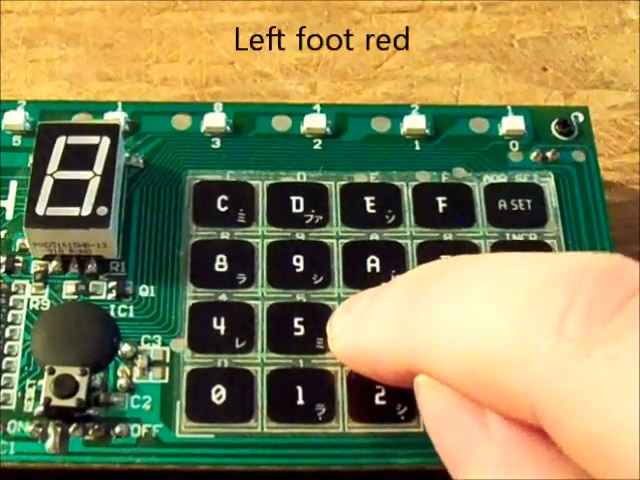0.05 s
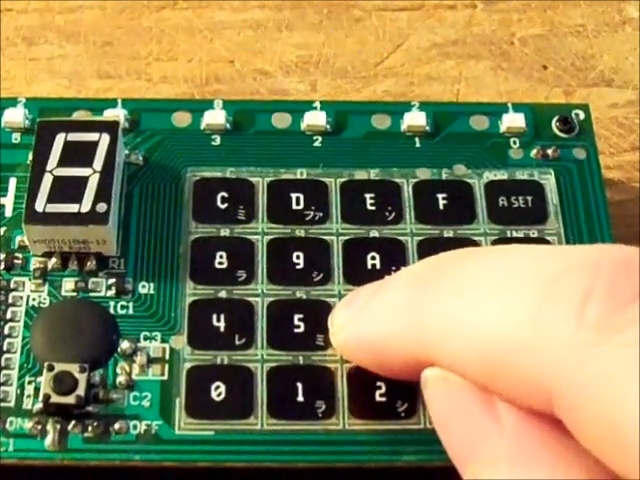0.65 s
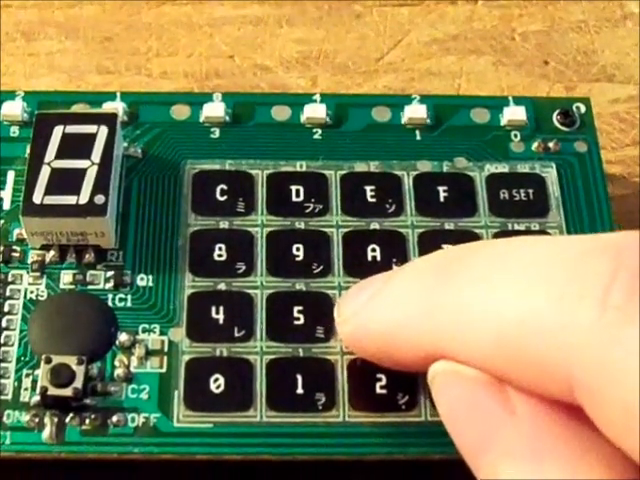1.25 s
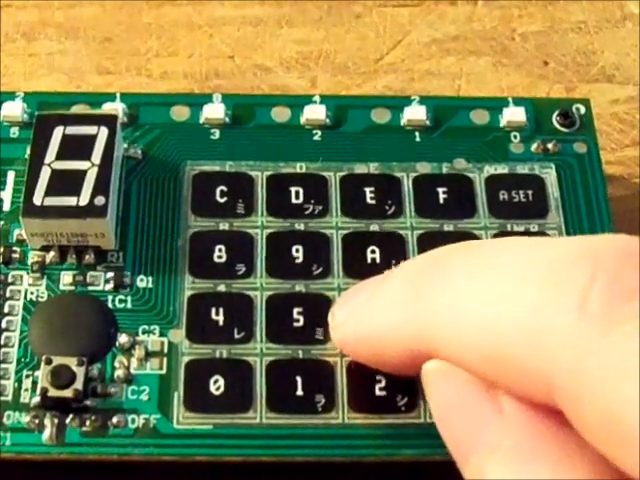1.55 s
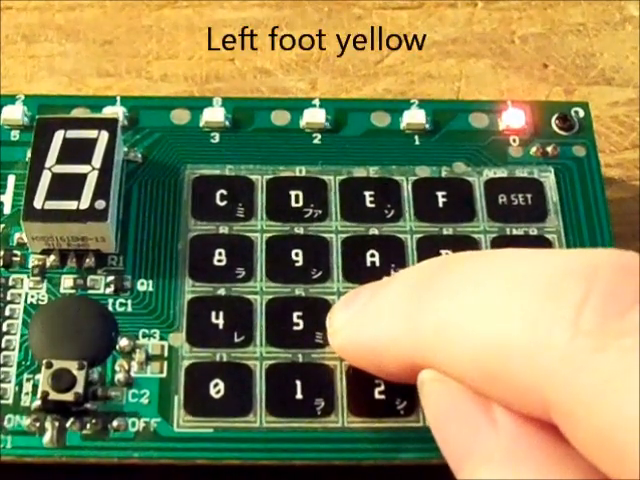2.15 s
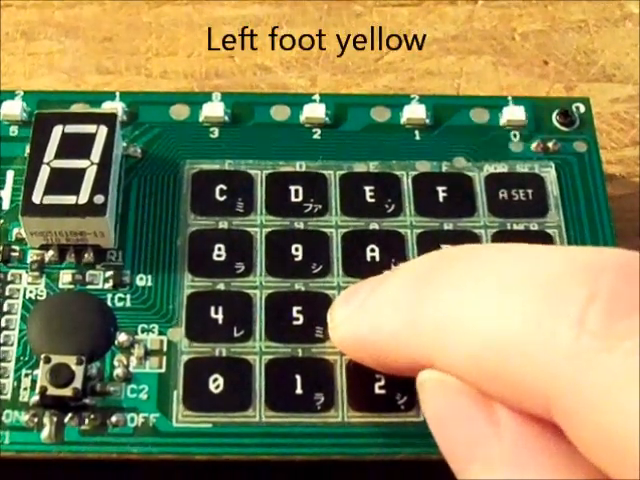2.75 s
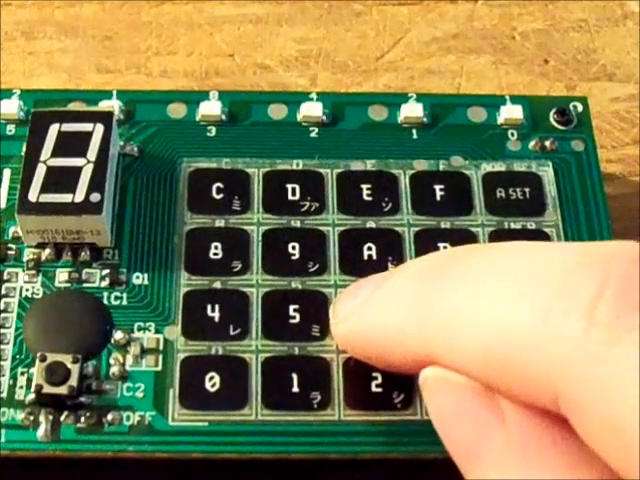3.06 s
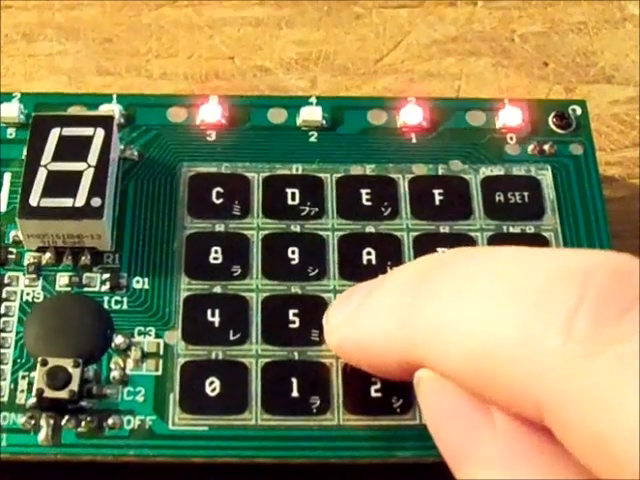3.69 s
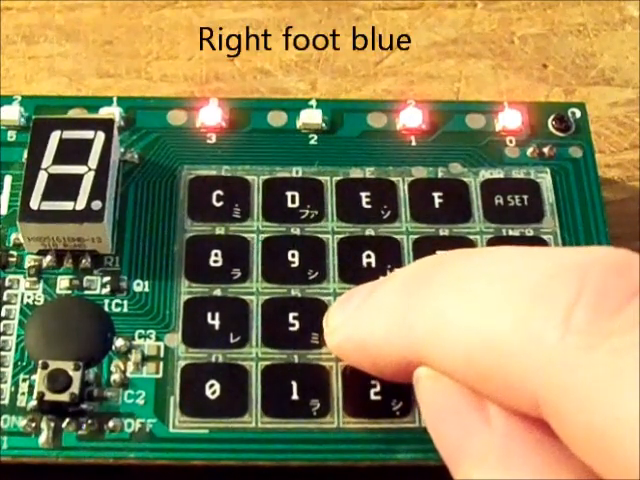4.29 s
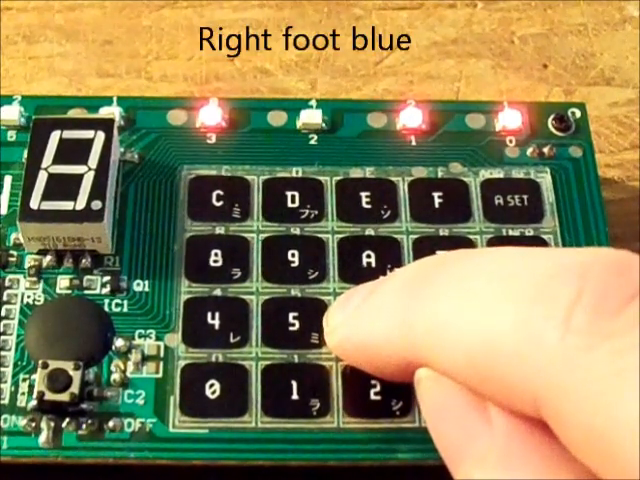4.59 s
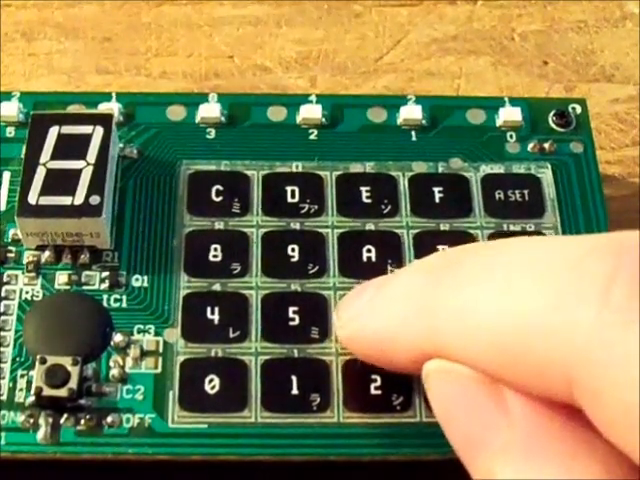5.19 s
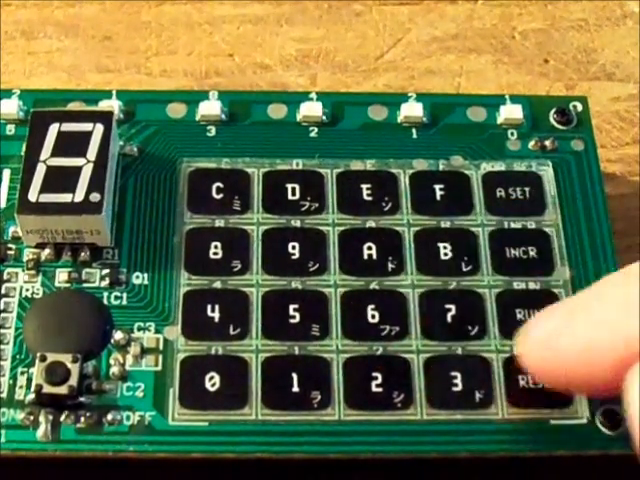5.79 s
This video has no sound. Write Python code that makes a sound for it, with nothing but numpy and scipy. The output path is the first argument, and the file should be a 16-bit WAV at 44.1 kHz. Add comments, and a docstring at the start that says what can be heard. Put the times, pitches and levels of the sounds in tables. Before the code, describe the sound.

A finger presses small plastic keys on a bare circuit board lying on a wooden table. A few faint ticks lead to one sharp double click, then lighter clicks follow a second or so apart, each ringing very briefly. Near the end the finger slides off with faint scrapes and a tiny tick. The microphone is close, in a small room with steady soft hiss and low rumble.

```python
"""Short plastic ticks come from the small keys of a keypad, pressed by a finger.
Each key snaps and shakes the bare circuit board under it, which lies on a wooden table
and rings briefly in a small room. At the end the finger slides off with faint scrapes.
A low room rumble and a soft hiss go on throughout. The recorder turns the level down
at the loudest snap and lets it creep back."""
import sys
import numpy as np
from scipy import signal
from scipy.fft import rfft, irfft
from scipy.io import wavfile
from scipy.ndimage import uniform_filter1d

SR = 44100
rng = np.random.default_rng(int(sys.argv[2]) if len(sys.argv) > 2 else 0)


def put_to_file(sound):
    """Save the sound as 16-bit audio at rate SR, in the file named by the first command-line argument."""
    columns = np.atleast_2d(sound).T  # one column per channel
    safe = np.clip(columns, -1, 1)
    whole_steps = np.round(safe * 32767)
    wavfile.write(sys.argv[1], SR, whole_steps.astype(np.int16))


N = 257544
T = np.arange(int(.25 * SR)) / SR  # seconds within one short sound
NOISE_TOP_HZ = 13950  # upper limit of the scrapes and the hiss


def keys(chatter_db=-6, chatter_s=0.00069, crack_db=-10, crack_s=0.0029):
    """Each contact is a tap plus a brief chatter of loose plastic, which rings the key and the board."""
    # Tones of a key cap and its spring: pitch_hz, level_db, ring_s
    key_tones = [(2000, -10.5, 0.016), (2960, -1, 0.013), (3355, -1.5, 0.016), (3950, 0, 0.011),
                 (5360, 0.5, 0.0042), (7700, -4.5, 0.012), (8540, -0.5, 0.0051), (9200, -27, 0.0022),
                 (9650, -11, 0.0036), (11500, -7, 0.0043), (13700, -4, .005)]
    # Tones of the board on the table: pitch_hz, level_db, ring_s
    board_tones = [(783, 3.5, 0.054), (1277, 0.5, 0.049), (1370, 1, 0.013), (1570, -8, .03),
                   (1630, -9, 0.027), (1780, -15, 0.024), (1940, -1, 0.033), (2094, -2, 0.015),
                   (2306, -9, 0.048), (2860, -8, 0.02), (3300, -23, .05)]
    out = np.zeros(N)
    for start_s, level_db, favoured_hz, pitch_factor, board_db, brightness in contacts():
        chatter, crack = rng.standard_normal((2, len(T)))
        push = undb(chatter_db) * unit(chatter * T * np.exp(-T / chatter_s))
        push[0] += 1  # the tap itself
        # countless fast-dying tones fill the gaps between the clear ones
        crack = unit(cut(crack * np.exp(-T / crack_s), 1500, "high"))
        body = ring(key_tones, pitch_factor) + undb(board_db) * ring(board_tones)
        body += undb(crack_db) * crack
        click = signal.fftconvolve(push, body)[:len(T)]
        click = favour(click, favoured_hz, boost_db=7)  # the struck spot stresses one pitch
        click = favour(click, hz=5500, boost_db=5)  # so does the metal dome under the key
        # harder blows are brighter: the treble reaches an octave higher for every 10 dB
        top_hz = brightness * 1.55 * favoured_hz * 2 ** ((level_db + 32) / 10)
        click = cut(click, top_hz, "low")
        # a small cap moving alone gives little bass; pressing on the board gives more
        lowest_hz = np.interp(board_db, [-14.5, -6.5], [3700, 520])
        add(out, start_s, cut(click, lowest_hz, "high"), level_db)
    return board_travel(out)


def contacts(snap_hz=8300, snap_board_db=-11.5, landing_lag_s=.0015, landing_brightness=0.7):
    """A rocking key makes one contact; a full press makes a bright snap, then a cushioned landing."""
    # Keys rocking under the finger (board_db is how strongly the board joins in):
    # start_s, level_db, favoured_hz, pitch_factor, board_db
    taps = [ (0.3441, -35, 2130, 1.06, -1), (0.8048, -32.5, 8000, 1.23, -11),
            (0.8211, -32, 3380, 0.88, -14), (0.8764, -17.5, 3200, 0.89, -1.5),
            (0.9625, -36.5, 2800, 0.85, -8), (1.5914, -31.5, 3980, 0.85, 4), (2.8502, -25, 2960, 0.93, -3),
            (2.8663, -32, 1880, 0.92, -5), (2.941, -32.5, 1860, 0.92, -9), (3.7106, -32, 1450, 0.74, -2), ]
    # Full presses (favoured_hz and board_db belong to the landing):
    # start_s, snap_db, landing_db, favoured_hz, pitch_factor, board_db
    presses = [ (0.8847, -24, -19, 1720, 1.04, 2), (2.8952, -28, -26, 4130, 1.03, 2.5),
               (5.0526, -32.5, -26, 4060, 1.01, 3.5), ]
    for start_s, level_db, favoured_hz, pitch_factor, board_db in taps:
        yield start_s, level_db, favoured_hz, pitch_factor, board_db, 1
    for start_s, snap_db, landing_db, favoured_hz, pitch_factor, board_db in presses:
        yield start_s, snap_db, snap_hz, pitch_factor, snap_board_db, 1
        yield start_s + landing_lag_s, landing_db, favoured_hz, pitch_factor, board_db, landing_brightness


def board_travel(x, lag_s=0.000683):
    """Waves that bend the board carry high tones fastest; lag_s is the travel time at 1000 Hz."""
    hz = np.fft.rfftfreq(len(x), 1 / SR)
    phase_lag = 4 * np.pi * lag_s * np.sqrt(1000 * hz)
    return irfft(rfft(x) * np.exp(-1j * phase_lag), len(x))


def finger_scrapes(lead_s=0.034, rasp_db=-7):
    """Tiny slips swell and fade as the finger drags over a key edge."""
    # Fingertip and nail catching on edges: peak_s, level_db, width_s, lowest_hz
    catches = [(5.21, -47, .008, 14000), (5.223, -48, 0.0013, 13000), (5.3255, -48.5, 0.0013, 11000),
               (5.41, -49, .002, 7000), (5.425, -47.5, 0.0071, 6000), (5.4343, -31.5, 0.0005, 5000)]
    # Tones of a scraped key edge: pitch_hz, level_db, ring_s
    edge_tones = [(8400, 2, 0.0046), (10400, -4, 0.0012), (12900, -12, .0015)]
    out = np.zeros(N)
    for peak_s, level_db, width_s, lowest_hz in catches:
        swell = np.exp(-.5 * ((T - lead_s) / width_s) ** 2)
        slips = rng.standard_normal(len(T)) * swell
        scrape = signal.fftconvolve(slips, ring(edge_tones))[:len(T)] + undb(rasp_db) * slips
        scrape = steep_cut(cut(scrape, lowest_hz, "high"), NOISE_TOP_HZ)
        add(out, peak_s - lead_s, scrape, level_db)
    return out


def room_echo(x, level_db=-17.5, ring_s=0.18, build_s=0.0065):
    """Sound bounces around a small room; the echo builds quickly and fades 60 dB in ring_s."""
    # Tone colour of the echo: pitch_hz, level_db
    echo_colour = [(200, -6), (760, -8), (1030, -8), (1400, -11), (2200, 1.5), (3200, -1.5), (5500, -7.5),
                   (9000, -6.5), (13800, -9), (14500, -30)]
    tail = colour(rng.standard_normal(len(T)), echo_colour)
    tail *= np.exp(-np.log(1000) * T / ring_s)
    tail *= 1 - np.exp(-(T / build_s) ** 2)
    return undb(level_db) * signal.fftconvolve(x, unit(tail))[:N]


def background(rumble_db=-43, hiss_db=-48.5):
    """The room rumbles low and the microphone hisses evenly."""
    # Tone colours of the rumble and the hiss: pitch_hz, level_db
    rumble_colour = [(8, -6), (15, 0.5), (32, -1), (50, -2), (70, -2.5), (125, -5), (200, -8), (310, -10),
                     (420, -14), (750, -18.5), (1000, -22), (1500, -49)]
    hiss_colour = [(600, -8), (1000, 0.5), (1500, .5), (2300, -2), (3100, -1), (3800, -3), (4300, 0.5),
                   (4650, 3.5), (5100, -5.5), (6200, -7), (7200, -6.5), (9000, -8), (11500, -8.5),
                   (14000, -9)]
    rumble = undb(rumble_db) * unit(colour(rng.standard_normal(N), rumble_colour))
    hiss = undb(hiss_db) * unit(colour(rng.standard_normal(N), hiss_colour))
    return steep_cut(np.sqrt(N) * (rumble + hiss), NOISE_TOP_HZ)


def ring(tones, pitch_factor=1):
    """A tapped object rings with several tones, each fading 60 dB in its ring_s."""
    pitch_hz, level_db, ring_s = np.transpose(tones)[:, :, None]
    strength = undb(level_db) / np.sqrt(ring_s)  # level_db sets a tone's total energy
    waves = np.cos(2 * np.pi * pitch_hz * pitch_factor * T)
    fade = np.exp(-np.log(1000) * T / ring_s)
    return unit(np.sum(strength * waves * fade, axis=0))


def favour(x, hz, boost_db):
    """Make a narrow band around one pitch louder."""
    band = signal.lfilter(*signal.iirpeak(hz, Q=6, fs=SR), x)
    return x + (undb(boost_db) - 1) * band


def colour(x, points):
    """Shape the bass and treble along a curve of (pitch_hz, level_db) points."""
    pitch_hz, level_db = np.transpose(points)
    hz = np.maximum(np.fft.rfftfreq(len(x), 1 / SR), 1)
    gain = undb(np.interp(np.log(hz), np.log(pitch_hz), level_db))
    return irfft(rfft(x) * gain, len(x))


def cut(x, hz, keep, order=2):
    """Keep the "low" or the "high" side of hz; a higher order cuts more sharply."""
    return signal.sosfilt(signal.butter(order, min(hz, SR / 2 - 1000), keep, fs=SR, output="sos"), x)


def steep_cut(x, hz):
    """Remove nearly everything above hz."""
    return signal.sosfilt(signal.ellip(16, .1, 80, hz, fs=SR, output="sos"), x)


def add(track, start_s, sound, level_db):
    """Mix in a short sound; its level is its energy spread over 5 ms."""
    part = track[int(start_s * SR):][:len(sound)]
    part += (unit(sound) * undb(level_db) * np.sqrt(.005 * SR))[:len(part)]


def undb(db):
    """Turn decibels into a multiplier."""
    return 10 ** (np.asarray(db) / 20)


def unit(x):
    """Scale to an energy of one."""
    return x / np.sqrt(np.sum(x ** 2))


def scene():
    """One microphone close to the keypad feeds both channels."""
    direct = keys() + finger_scrapes()
    mono = direct + room_echo(direct) + background()
    return np.array([mono, mono])


def record(dry, threshold_db=-20, recovery_db_per_s=0.33, smoothing_hz=40, top_hz=14900):
    """The recorder turns down at the loudest snap, creeps back over seconds and cuts the top treble."""
    power = uniform_filter1d(dry[0] ** 2, size=220)  # 5 ms average
    over_db = np.maximum(10 * np.log10(np.abs(power) + 1e-12) - threshold_db, 0)
    recovered_db = recovery_db_per_s * np.arange(N) / SR
    dip_db = np.maximum.accumulate(over_db + recovered_db) - recovered_db
    gain = undb(-cut(dip_db, smoothing_hz, "low", order=1))
    return cut(dry * gain, top_hz, "low", order=24)


dry = scene()
out = record(dry)
put_to_file(out)
```